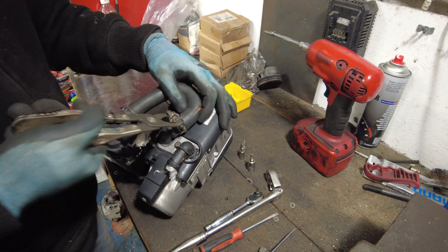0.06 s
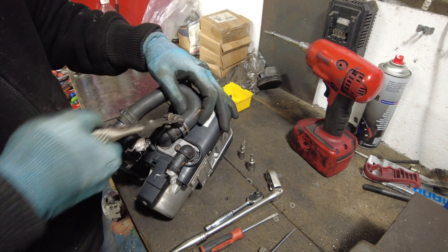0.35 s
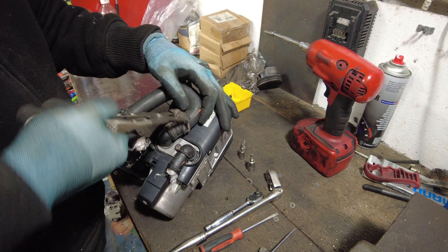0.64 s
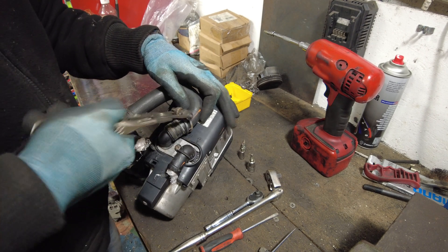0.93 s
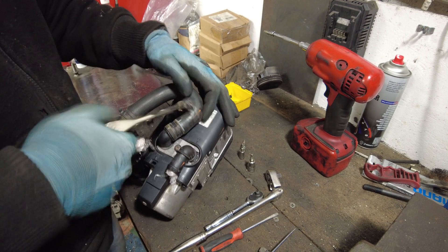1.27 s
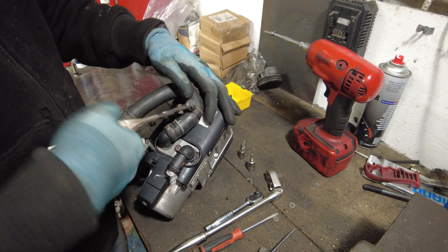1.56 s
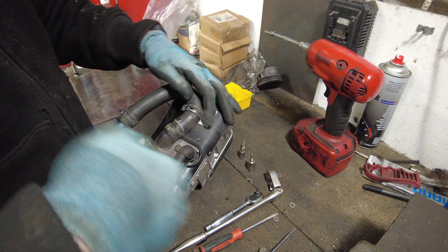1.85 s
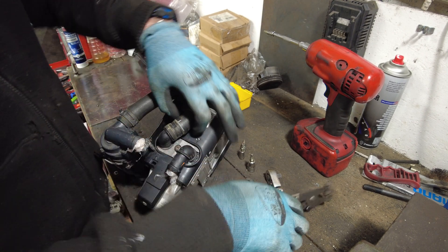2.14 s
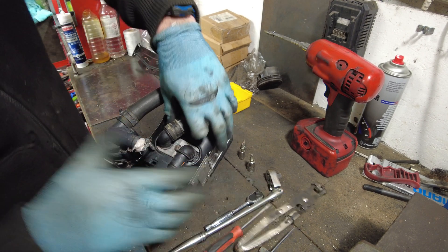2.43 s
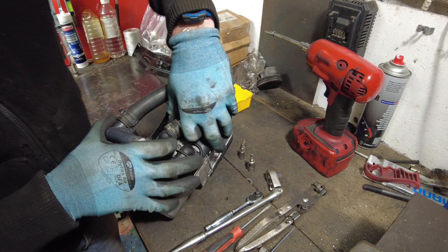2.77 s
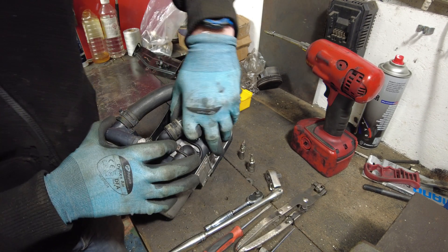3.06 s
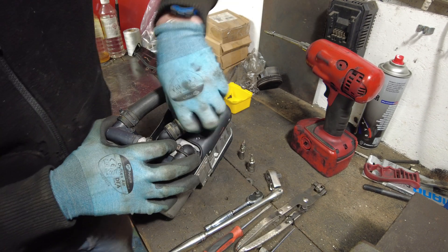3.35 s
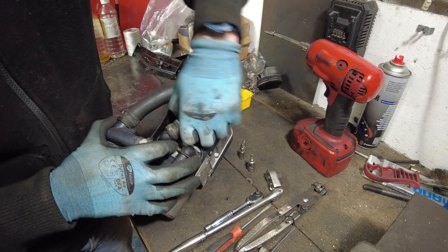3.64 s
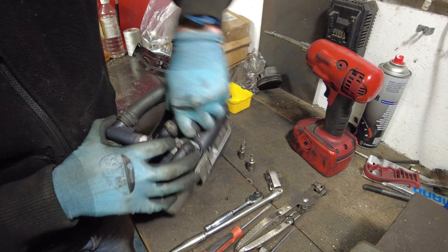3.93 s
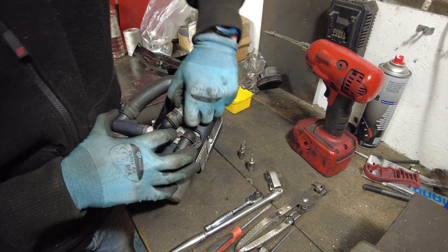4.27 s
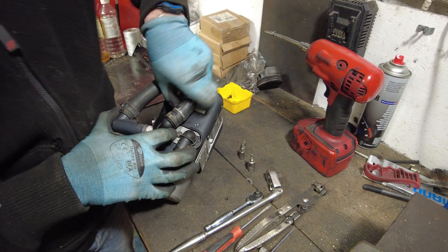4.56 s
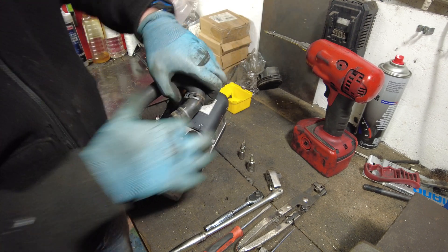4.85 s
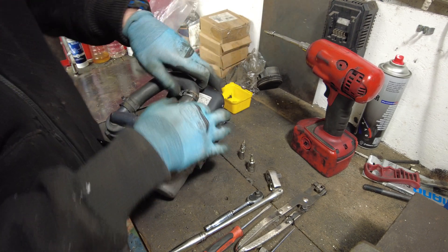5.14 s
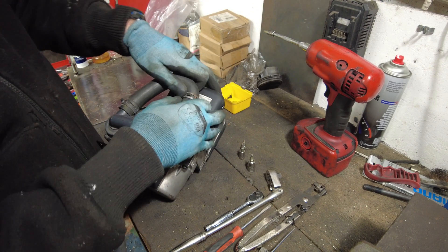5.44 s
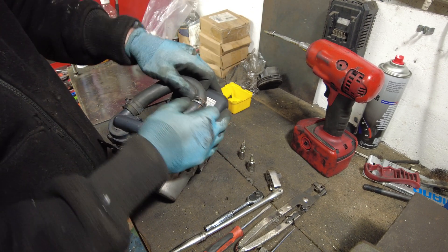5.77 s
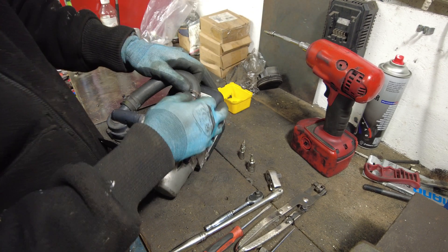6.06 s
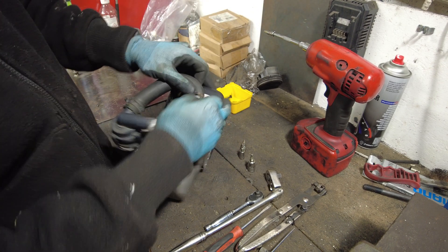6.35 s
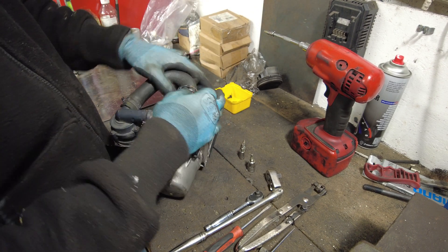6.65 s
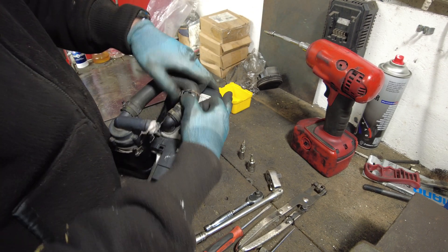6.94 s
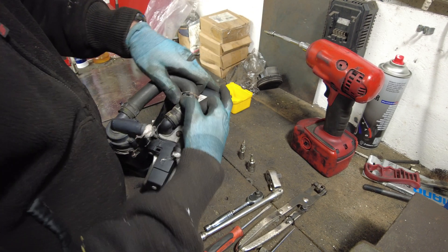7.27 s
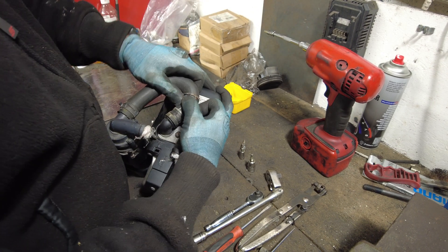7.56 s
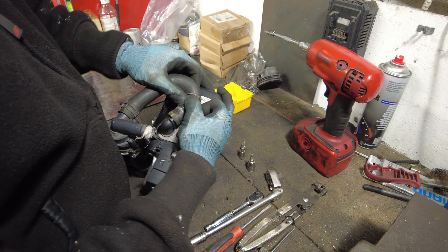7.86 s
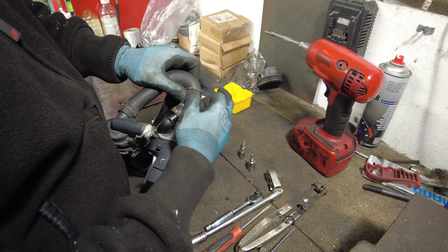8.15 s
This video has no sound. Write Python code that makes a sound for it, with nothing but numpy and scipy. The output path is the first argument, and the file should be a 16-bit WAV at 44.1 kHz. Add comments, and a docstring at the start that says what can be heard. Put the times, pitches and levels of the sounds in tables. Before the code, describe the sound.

Gloved hands work a rubber hose off a plastic housing with clicks and knocks, and dropped pliers clatter on a workbench.

```python
"""Working a hose off a heater

Gloved hands twist a rubber hose off a plastic heater body on the bench of a small workshop.
Pliers slip on the clamp, snap shut and are dropped, bouncing and jangling on the board.
The heater rocks, thumps and judders; rubber sticks and slips in ticks, creaks and a squeak.
Plastic clicks, gloves and sleeves rub, and the shaken bench rumbles in the microphone."""
import sys
import numpy as np
from scipy import signal
from scipy.fft import rfft, irfft, next_fast_len
from scipy.io import wavfile
from scipy.ndimage import uniform_filter1d

SR = 44100
rng = np.random.default_rng(int(sys.argv[2]) if len(sys.argv) > 2 else 0)


def master(y):
    """Save y as 16-bit WAV."""
    cut = np.clip(np.atleast_2d(y).T, -1, 1)
    pcm = np.round(cut * 32767)  # scale
    wavfile.write(sys.argv[1], SR, pcm.astype(np.int16))


N = 366461
TIME = np.arange(N) / SR

# Table levels are relative: each layer adds its own trim.
# the dropped pliers land, topple and bounce: start_s, steel_db, board_db, jaw_ring_db
BOUNCES = [(2.2869, -27.5, -22, -44), (2.2939, -32.5, -27.5, -32.5), (2.336, -41, -43, -58.5),
           (2.382, -15.5, -17.5, -24), (2.4011, -27, -6.5, -47.5), (2.426, -31, -30, -33.5),
           (2.454, -30.5, -20, -38.5), (2.519, -29.5, -16, -61), (2.545, -30.5, -41, -57),
           (2.5767, -58, -28.5, -75), (2.646, -39.5, -34, -67)]
# spectrum of a dry steel click: freq_hz, level_db
STEEL_CLICK = [(300, -25.5), (700, -13), (1500, -11), (2100, 2), (2500, -4.5), (3150, 1), (3900, -1.5),
               (4400, 1), (5500, -7.5), (6500, -4), (7000, -9.5), (8500, -9)]
# spectrum of its bright edge: freq_hz, level_db
STEEL_EDGE = [(8000, -5.5), (9500, 1), (10500, -2), (11600, -1), (13000, -2.5), (14600, -3.5), (15900, -3)]
# the heater rocks, knocking when hard and thudding when soft: start_s, level_db, hardness_db
THUMPS = [(0.025, -38, -2), (0.062, -39, -11), (0.249, -35.5, -4.5), (0.408, -50, -8), (0.825, -46, -4),
          (1.352, -20, 5), (1.359, -25, 3), (1.386, -35.5, 8.5), (1.401, -44, 16), (1.515, -43.5, 11),
          (1.529, -41, 3.5), (2.851, -51.5, -7.5), (4.007, -44, 0.5), (4.114, -41.5, -0.5),
          (4.285, -54, 11), (4.621, -43, 4.5), (4.996, -43.5, 0), (5.064, -35.5, 1), (5.148, -42, 2.5),
          (5.431, -39, -3), (5.997, -48.5, 11), (6.523, -34, -1.5), (6.645, -41.5, 2.5),
          (7.163, -52, -12.5), (7.563, -56, 3.5)]
# modes of the plastic casing: pitch_hz, level_db, t60_s
CASING_MODES = [(338, -8.5, 0.03), (394, -2.5, 0.025), (457, 2.5, 0.035), (500, -12.5, 0.18),
                (576, -1, 0.017), (655, -7, .015), (880, -7.5, 0.012)]
# spectrum of a dull bump on the casing: freq_hz, level_db
CASING_BUMP = [(90, 11), (170, -7), (320, -5.5), (600, -17.5), (1100, -45), (2500, -45)]
# effort of the hands: time_s, rubbing_db, bench_sway_db
HANDLING = [(0.0, -57.5, -36.5), (0.67, -67.5, -53), (1.2, -63, -56), (1.55, -52, -48), (1.78, -64, -51.5),
            (2.27, -60.5, -49), (2.48, -44, -40), (2.71, -62, -48.5), (3.17, -63.5, -55.5),
            (3.96, -60, -51.5), (4.14, -60.5, -46), (4.44, -63, -52.5), (5.09, -57.5, -42),
            (5.81, -67.5, -56), (6.43, -63, -50.5), (7.1, -61, -54), (7.55, -69, -57), (8.31, -75, -56)]


def pliers(slip_lead_s=0.0059):
    """Steel contacts click and set the jaws ringing; in the fall the handles jangle too."""
    # the held pliers slip on the clamp, then snap shut: start_s, click_db, edge_db
    clamp_clicks = [(1.3453, -45, -56), (1.3833, -31.5, -55), (1.5268, -25.5, -37.5), (1.636, -40, -72),
                    (1.6428, -37.5, -60), (1.7443, -47.5, -70), (1.888, -46.5, -65), (2.01, -9, -27)]
    # thin ring of the jaws: pitch_hz, level_db, t60_s
    jaw_modes = [(7280, -4, .025), (7396, -4, 0.072), (7480, -3, 0.035)]
    # the last bounces shake a loose steel part: start_s, level_db
    loose_rings = [(2.534, -56), (2.646, -74)]
    # modes of that part: pitch_hz, level_db, t60_s
    loose_modes = [(9660, 0, .16), (9750, -2, .09)]
    out = np.zeros(N)
    contacts = [(s, db, edge_db, db - 24) for s, db, edge_db in clamp_clicks]  # the hand damps the jaws
    for s, db, _, ring_db in BOUNCES:
        contacts.append((s, db, db - 12.5 - bench_damping_db(s), ring_db))
        add(out, s, from_db(db - 14.5) * jangle())
    for s, click_db, edge_db, ring_db in contacts:
        add(out, s, from_db(click_db - 8) * crack(STEEL_CLICK, t60=0.014, after_db=-26.5, after_t60=0.08))
        add(out, s, from_db(edge_db) * crack(STEEL_EDGE, t60=0.011, after_db=-19.5, after_t60=0.067))
        add(out, s, from_db(ring_db - 2) * strike(jaw_modes, grit=0.28, grit_t60=0.01, vary_db=4))
    for s, db, _ in clamp_clicks:
        skid = crack(STEEL_CLICK, t60=0.012, after_db=-18.5, after_t60=0.03)
        add(out, s - slip_lead_s, from_db(db - 37) * skid)
    for s, db in loose_rings:
        add(out, s, from_db(db) * strike(loose_modes, grit=0.6, grit_t60=0.03))
    return out


def joint_rattle(rebounds_per_s=520, longest_s=0.055, fade_db=9):
    """The pliers' loose joint chatters after each bounce, more briefly after weak ones."""
    out = np.zeros(N)
    hardest_db = max(db for _, db, _, _ in BOUNCES)
    for s, db, _, _ in BOUNCES:
        length_s = longest_s * from_db(0.5 * (db - hardest_db))
        count = max(int(length_s * rebounds_per_s), 1)
        edge_gain = from_db(-0.5 - bench_damping_db(s))
        for progress in (np.arange(count) + rng.random(count)) / count:
            gain = from_db(db - 23 - fade_db * progress + rng.standard_normal())
            click = crack(STEEL_CLICK, t60=0.0069, after_db=-12.5, after_t60=0.035)
            edge = edge_gain * crack(STEEL_EDGE, t60=0.009, after_db=-18, after_t60=0.045)
            at = s + progress * length_s
            add(out, at, gain * (click + edge))
            add(out, at, gain * from_db(-8.5) * jangle())
    return out


def jangle(t60=0.035):
    """The steel handles ring briefly, a little differently at each touch."""
    # overtones of the handles: pitch_hz, level_db
    overtones = [(2240, -6.5), (2980, -0.5), (3456, -1), (4587, -4.5), (4829, -3), (5529, 0), (6223, 0),
                 (6500, -1), (9254, -10.5), (13750, -7.5), (14680, -6)]
    return strike([(hz, db, t60) for hz, db in overtones], grit=1, grit_t60=0.035, detune=0.0073)


def bench_damping_db(s, flat_at_s=2.39, db_per_s=85.5):
    """Once the pliers lie flat, the bench takes more and more off their bright edge."""
    return db_per_s * max(s - flat_at_s, 0)


def bench_knocks(low_cut_hz=270, second_handle_s=0.007):
    """Both handles hit the board, which radiates little bass; the weight thuds through the frame."""
    # knock of the board: pitch_hz, level_db, t60_s
    board_modes = [(272, -24.5, 0.085), (371, -4, 0.054), (420, -4.5, 0.064), (496, 6, 0.048),
                   (578, -7, 0.088), (643, -4, 0.11), (760, -11.5, 0.14), (836, -17.5, 0.086)]
    # its higher clack: pitch_hz, level_db, t60_s
    clack_modes = [(930, -6, 0.04), (981, -13.5, 0.15), (1137, 0.5, 0.024), (1194, -9.5, 0.12),
                   (1367, -15, 0.05), (1520, -4.5, .025), (1737, -17, 0.11)]
    # spectrum of the clatter on the bench top: freq_hz, level_db
    clatter = [(350, -11.5), (700, 5.5), (1200, 3), (1650, -12), (2100, -22), (3500, -23.5)]
    # modes of the bench frame: pitch_hz, level_db, t60_s
    frame_modes = [(71, -1.5, 0.08), (96, -3.5, 0.16), (205, -3, 0.05), (271, 1, 0.049)]
    board, frame = np.zeros((2, N))
    for s, _, db, _ in BOUNCES:
        for at, blow_db in ((s, db), (s + second_handle_s, db - 15.5)):
            add(board, at, from_db(blow_db - 6.5) * strike(board_modes, grit=0.18, grit_t60=0.05))
            clack_gain = from_db(1.3 * blow_db - 11.5)  # hard blows clack more
            add(board, at, clack_gain * strike(clack_modes, grit=0.34, grit_t60=0.05))
            add(board, at, clack_gain * crack(clatter, t60=0.018, after_db=-6, after_t60=0.21))
        frame_db = min(-30.5 - 58.5 * (s - BOUNCES[0][0]), db)  # the first bounces carry the weight
        add(frame, s, from_db(frame_db) * strike(frame_modes, grit=0.71, grit_t60=0.09))
    low_cut = signal.butter(3, low_cut_hz, "high", fs=SR, output="sos")
    return signal.sosfilt(low_cut, board) + frame


def heater_thumps(high_cut_hz=1300):
    """The casing knocks, its hollow booms and its weight thuds; the grip shifts the pitches."""
    # boom of the hollow: pitch_hz, level_db, t60_s
    boom_modes = [(97, -10.5, 0.25), (150, -4.5, 0.033), (190, 1.5, 0.071), (281.7, -1.5, 0.06)]
    # thud through the bench: pitch_hz, level_db, t60_s
    thud_modes = [(37, -5.5, 0.067), (50, 0.5, 0.099), (74.4, 0.5, 0.014)]
    out = np.zeros(N)
    for s, db, hardness_db in THUMPS:
        knock = strike(CASING_MODES, grit=0.41, grit_t60=0.14, detune=0.018)
        bump = crack(CASING_BUMP, t60=0.034, after_db=-14, after_t60=0.058)
        boom = strike(boom_modes, grit=0.54, grit_t60=0.044, detune=0.039)
        thud = strike(thud_modes, grit=0.4, grit_t60=0.044, detune=0.085)
        add(out, s, from_db(db + hardness_db - 4.5) * knock)
        add(out, s, from_db(db + 0.28 * hardness_db - 4.5) * bump)
        add(out, s, from_db(db + 0.44 * hardness_db - 5) * boom)
        add(out, s, from_db(db - hardness_db + 5) * thud)
    return signal.sosfilt(signal.butter(2, high_cut_hz, fs=SR, output="sos"), out)


def heater_judders(slips_per_s=320):
    """The heater's feet stick and slip on the bench; each slip knocks the casing."""
    # shoves: start_s, length_s, level_db
    shoves = [(1.643, 0.045, -45), (3.912, .03, -55.5), (4.02, 0.14, -52), (5.062, 0.052, -54),
              (5.982, 0.05, -54.5)]
    slips = (rng.random(N) < slips_per_s / SR) * rng.standard_normal(N)
    knock = strike(CASING_MODES, grit=0.1, grit_t60=0.008, vary_db=1.5)
    return sliding(shoves) * unit_power(signal.fftconvolve(slips, knock)[:N])


def hose_ticks(usual_hz=1240, tiny_per_s=9):
    """Rubber lets go with a damped pop and a small snap; tiny slips fall at random in between."""
    # hose and clamp tick on the plastic: start_s, level_db, pitch_hz
    ticks = [(0.02, -36, 1210), (0.034, -42, 950), (0.578, -47.5, 1160), (0.974, -50.5, 2270),
             (1.344, -21, 1235), (1.386, -25, 1280), (1.526, -26, 1690), (1.58, -38.5, 1670),
             (4.284, -47, 1300), (4.337, -24, 1270), (4.62, -35.5, 1227), (5.462, -36, 1270),
             (6.084, -46.5, 1290), (6.318, -38, 1240), (6.395, -42.5, 1560), (6.526, -30, 1000),
             (7.998, -46, 1204)]
    # spectrum of the plastic's snap: freq_hz, level_db
    snap = [(1900, 19), (2600, 4), (4000, 0.5), (7000, -15), (15000, -38)]
    out = np.zeros(N)
    chance = rng.random((int(tiny_per_s * N / SR), 3))
    tiny = [(when * TIME[-1], -67 + 10 * size, usual_hz * 2 ** (spot - 0.35))
            for when, size, spot in chance]
    for s, db, hz in ticks + tiny:
        pop_modes = [(hz * 0.84, -9, 0.014), (hz, 0, 0.016), (hz * 1.283, -6, 0.011)]
        snap_db = db - 17 + 11 * np.log2(hz / usual_hz)  # stiffer, higher spots snap more
        add(out, s, from_db(db - 4.5) * strike(pop_modes, grit=0.7, grit_t60=0.026, vary_db=3))
        add(out, s, from_db(snap_db) * crack(snap, t60=0.015, after_db=-21, after_t60=0.086))
    return out


def hose_creaks(slips_per_s=330, spread_db=4.5):
    """Twisted rubber sticks and slips unevenly; each slip sets the joint ringing."""
    # twists of the hose on its stub: start_s, length_s, level_db
    twists = [(0.736, 0.087, -48.5), (1.066, 0.037, -44), (1.318, 0.019, -34), (3.98, 0.044, -45.5)]
    # modes of the joint: pitch_hz, level_db, t60_s
    joint_modes = [(1165, 0.5, 0.059), (1300, -3.5, 0.033), (1540, -18, 0.037), (1800, -10.5, .025),
                   (2050, -15.5, 0.016), (2740, -17.5, 0.013)]
    slips = (rng.random(N) < slips_per_s / SR) * from_db(spread_db * rng.standard_normal(N))
    ring = strike(joint_modes, grit=0.15, grit_t60=0.008, vary_db=2.1)
    return sliding(twists) * unit_power(signal.fftconvolve(slips, ring)[:N])


def plastic_clicks():
    """Hard plastic meets plastic: a very short, wide crack on a dry bump of the casing."""
    # parts touch: start_s, click_db, bump_db
    clicks = [(3.107, -58, -41.5), (3.561, -48, -44), (3.6496, -39.5, -33.5), (4.6287, -39, -41),
              (4.6628, -53, -38), (4.708, -63, -35.5), (4.9984, -47, -30), (5.4598, -39.5, -48),
              (6.2, -50, -43.5), (8.0529, -53, -44)]
    # spectrum of the click: freq_hz, level_db
    plastic = [(500, -21), (1000, 9), (2300, 3), (3300, -4), (5000, -13.5), (8000, -18.5), (14000, -37)]
    out = np.zeros(N)
    for s, click_db, bump_db in clicks:
        add(out, s, from_db(click_db - 2) * crack(plastic, t60=0.022, after_db=-33, after_t60=0.03))
        add(out, s, from_db(bump_db - 3) * crack(CASING_BUMP, t60=0.031, after_db=-27, after_t60=0.06))
    return out


def squeaks():
    """Stick and slip: the hose gives a falling chirp, the housing sings roughly under a glove."""
    # the hose squeaks on its stub: time_s, fundamental_hz, level_db
    glide = [(0.62, 2280, -108), (0.64, 2157, -62), (0.66, 2145, -62), (0.672, 1580, -85),
             (0.682, 1600, -54.5), (0.70, 750, -69), (0.71, 590, -87)]
    # a glove drags over the housing: time_s, level_db
    drag = [(4.99, -58), (5.04, -1), (5.10, 1), (5.21, 12.5), (5.235, -16), (5.31, -12), (5.36, -62)]
    # the tones it raises: pitch_hz, level_db
    drag_tones = [(969, -74.5), (1211, -64), (2030, -67), (2900, -78.5), (4301, -78), (7079, -84.5),
                  (9588, -86.5)]
    hz, db = in_time(glide)
    phase = 2 * np.pi * np.cumsum(hz * (1 + 0.014 * drift(rate_hz=1300))) / SR
    chirp = from_db(db) * (np.sin(2 * phase) + 0.3 * np.sin(phase))
    singing = sum(from_db(tone_db + 2.5) * drift(rate_hz=380) * np.sin(2 * np.pi * tone_hz * TIME)
                  for tone_hz, tone_db in drag_tones)
    return chirp + from_db(in_time(drag)[0]) * singing


def rubbing(stick_db=-52, usual_db=-65):
    """Gloves drag on hose and casing with a swish of fabric; hard strokes stick into a narrow rasp."""
    # gloves drag on the rubber: start_s, length_s, level_db
    glove_strokes = [(0.008, 0.048, -47), (0.734, 0.086, -57), (1.066, 0.06, -52.5), (1.225, 0.094, -64),
                     (1.294, 0.11, -50.5), (1.503, 0.012, -48), (1.645, 0.048, -57.5), (2.223, 0.053, -58),
                     (2.86, 0.075, -66.5), (3.584, 0.069, -57.5), (3.72, 0.13, -61.5), (3.885, .07, -59),
                     (3.973, 0.082, -59.5), (4.039, 0.12, -53), (6.412, 0.16, -58), (6.825, 0.17, -54.5),
                     (6.97, 0.11, -60.5), (7.09, 0.14, -57.5), (7.335, 0.089, -61.5), (7.685, 0.11, -63.5),
                     (7.959, 0.12, -58.5)]
    # a sleeve brushes past: start_s, length_s, level_db
    sleeve_moves = [(0.01, 0.4, -68), (3.268, 0.062, -58), (3.364, 0.12, -67.5), (4.69, 0.25, -64),
                    (5.823, 0.12, -66), (6.42, 0.085, -63), (6.655, 0.045, -66.5), (6.827, 0.14, -63.5),
                    (7.959, 0.081, -68)]
    # a glove scrapes over the housing: start_s, length_s, level_db
    scrapes = [(5.05, 0.18, -56.5), (5.23, 0.1, -57)]
    # low rub of the casing: freq_hz, level_db
    casing_spectrum = [(60, -11), (100, 8.5), (200, 1), (320, -0.5), (480, -1), (750, -5.5), (1100, -36.5)]
    # sliding glove: freq_hz, level_db
    glove_spectrum = [(100, -40.5), (500, -20.5), (900, -1), (1200, 0), (2100, -4), (2700, -7), (3600, -17),
                      (4500, -15.5), (7000, -23.5), (14000, -42)]
    # sticking rubber: freq_hz, level_db
    rasp_spectrum = [(300, -43.5), (850, -12), (1140, -5.5), (1280, 2), (1420, 0), (1950, -13.5),
                     (2500, -16.5), (3500, -38), (7000, -46.5)]
    # hiss of fabric: freq_hz, level_db
    fabric_spectrum = [(1800, -19), (3200, -0.5), (4500, -1.5), (7000, -4), (10000, -8.5), (13000, -11),
                       (16000, -15)]
    # gritty scrape: freq_hz, level_db
    scrape_spectrum = [(400, -19.5), (900, -1.5), (1250, 1), (2100, -7), (2500, -20.5), (5000, -20),
                       (12000, -33.5)]
    effort_db, _ = in_time(HANDLING)
    pressure = from_db(usual_db + 0.87 * (effort_db - usual_db))
    strokes, sleeves = sliding(glove_strokes), sliding(sleeve_moves)
    # The glove slides with each arm move, and its knitted back hisses with each stroke.
    grip = from_db(-7.5) * pressure + from_db(-3.5) * strokes + from_db(-4.5) * sleeves
    swish = from_db(-17) * pressure + from_db(-3) * sleeves + from_db(-24) * strokes
    sticking = grip ** 2 / (grip ** 2 + from_db(stick_db) ** 2)
    casing_drive = from_db(-3.5) * pressure + from_db(-5.5) * grip
    casing = casing_drive * friction(casing_spectrum, grain_db=2.5, flutter_db=3.5)
    gloves = grip * np.sqrt(1 - sticking) * friction(glove_spectrum, grain_db=1.5, flutter_db=4.3)
    rasp = from_db(3) * grip * np.sqrt(sticking) * friction(rasp_spectrum, grain_db=4, flutter_db=-0.5)
    fabric = swish * friction(fabric_spectrum, grain_db=1, flutter_db=2)
    scrape = sliding(scrapes) * friction(scrape_spectrum, grain_db=4.5, flutter_db=1)
    return casing + gloves + rasp + scrape + fabric


def bench_rumble(jolt_t60=0.7, jolt_rise_s=0.012):
    """The bench sways under the hands, more after each thump, and shakes the microphone."""
    # deep rumble: freq_hz, level_db
    spectrum = [(8, -28), (20, 8), (35, -3), (50, 0), (65, -11), (80, -20), (98, -17), (140, -28),
                (300, -59.5), (900, -100)]
    _, sway_db = in_time(HANDLING)
    power = from_db(sway_db + 3) ** 2
    jolt = decay(TIME[:SR], jolt_t60) * (1 - np.exp(-TIME[:SR] / jolt_rise_s))
    for s, db, hardness_db in THUMPS:
        add(power, s, (from_db(db - hardness_db - 10) * jolt) ** 2)
    return np.sqrt(power) * colour(rng.standard_normal(N), spectrum)


def room_tone(level_db=-63):
    """A steady low murmur with a faint hiss."""
    # the quiet workshop: freq_hz, level_db
    spectrum = [(12, -28), (20, 4), (48, -4.5), (96, -5), (255, -27.5), (849, -32), (1260, -39),
                (1810, -42), (2390, -31), (3160, -38), (12100, -45), (16000, -70)]
    return from_db(level_db) * colour(rng.standard_normal(N), spectrum)


def workshop(x, early_db, early_t60, tail_db):
    """Adds quick scatter from bench and wall, then a tail that dies sooner in the treble."""
    # decay of the room: freq_hz, t60_s
    room_t60 = [(100, 0.38), (500, 0.25), (1500, 0.16), (4000, 0.23), (8000, 0.22), (15000, 0.11)]
    t = TIME[:SR // 2]
    octaves_hz = 62.5 * 2 ** np.arange(9)
    tail = 0
    for low, high in zip(octaves_hz, octaves_hz[1:]):
        band_pass = signal.butter(2, [low, high], "band", fs=SR, output="sos")
        band = signal.sosfilt(band_pass, rng.standard_normal(len(t)))
        tail = tail + band * decay(t, at_hz(room_t60, np.sqrt(low * high)))
    early = rng.standard_normal(len(t)) * decay(t, early_t60) * (t > 0.003)
    tail = tail * (t > 0.008)
    echo = from_db(early_db) * early / np.linalg.norm(early)
    echo += from_db(tail_db) * tail / np.linalg.norm(tail)
    return x + signal.fftconvolve(x, echo)[:N]


def strike(modes, grit, grit_t60, vary_db=3.5, detune=0):
    """One blow: modes ring with fresh strengths while the contact chatters briefly."""
    hz, db, t60 = np.transpose(modes)[:, :, None]
    hz = hz * (1 + detune * rng.standard_normal(hz.shape))
    t = TIME[:int(min(t60.max(), 0.5) * SR)]
    polarity = (-1) ** np.arange(len(db))[:, None]
    gains = polarity * from_db(db + vary_db * rng.standard_normal(db.shape))
    ring = np.sum(gains * np.sin(2 * np.pi * hz * t) * decay(t, t60), axis=0)
    contact_t = TIME[:SR // 10]
    chatter = rng.standard_normal(len(contact_t)) * decay(contact_t, grit_t60)
    force = (contact_t == 0) + grit * chatter / np.linalg.norm(chatter)
    return punch(signal.fftconvolve(ring, force))


def crack(spectrum, t60, after_db, after_t60, rise_s=0.00028):
    """Overtones too crowded to have a pitch: a sudden burst, then a weaker after-ring."""
    t = TIME[:SR // 8]
    hz = np.fft.rfftfreq(len(t), 1 / SR)
    inside = (hz > spectrum[0][0]) & (hz < spectrum[-1][0])
    overtones = irfft(rfft(rng.standard_normal(len(t))) * inside * from_db(at_hz(spectrum, hz)), len(t))
    envelope = decay(t, t60) + from_db(after_db) * decay(t, after_t60)
    return punch(overtones * envelope * (1 - np.exp(-t / rise_s)))


def friction(spectrum, grain_db, flutter_db):
    """Countless tiny slips of uneven size, coming in clumps."""
    slips = rng.standard_normal(N)
    clumps = from_db(grain_db * drift(rate_hz=700) + flutter_db * drift(rate_hz=45))
    return colour(slips * clumps, spectrum)


def sliding(moves):
    """Summed gain of moves that each swell, ease off and stop."""
    progress, gain = [-0.1, 0.28, 0.88, 1.01], [0.0022, 1.0, 0.55, 0.0029]
    return sum(from_db(db) * np.interp((TIME - s) / length, progress, gain) for s, length, db in moves)


def colour(x, spectrum):
    """Give a steady sound a spectrum, at unit power."""
    size = next_fast_len(N)
    gains = from_db(at_hz(spectrum, np.fft.rfftfreq(size, 1 / SR)))
    return unit_power(irfft(rfft(x, size) * gains, size)[:N])


def drift(rate_hz):
    """A random wander with a spread of about one."""
    knots = rng.standard_normal(int(N / SR * rate_hz) + 2)
    return np.interp(TIME * rate_hz, np.arange(len(knots)), knots)


def decay(t, t60):
    """A fade of 60 dB every t60 seconds."""
    return np.exp(-np.log(1000) * t / t60)


def punch(blow):
    """Scale a blow so that its loudest 4 ms have unit power."""
    return blow / np.sqrt(uniform_filter1d(blow ** 2, size=176).max())


def unit_power(x):
    """Scale to a mean square of one."""
    return x / np.sqrt(np.mean(x ** 2) + 1e-20)


def from_db(db):
    """Decibels to gain."""
    return 10 ** (np.asarray(db) / 20)


def in_time(rows):
    """Each column of a curve, at every sample."""
    s, *columns = np.transpose(rows)
    return [np.interp(TIME, s, column) for column in columns]


def at_hz(points, hz):
    """Read a table on a log-frequency axis."""
    freq_hz, value = np.transpose(points)
    return np.interp(np.log(np.maximum(hz, 1)), np.log(freq_hz), value)


def add(out, s, sound):
    """Mix a sound in at s seconds."""
    start = max(int(s * SR), 0)
    out[start:start + len(sound)] += sound[:N - start]


def scene():
    """Sharp and dull contacts echo in the workshop, over rubbing, rumble and room tone; mono."""
    sharp = pliers() + joint_rattle() + hose_ticks() + plastic_clicks() + hose_creaks() + squeaks()
    sharp = workshop(sharp, early_db=-10.5, early_t60=0.046, tail_db=-18)
    dull = bench_knocks() + heater_thumps() + heater_judders()
    dull = workshop(dull, early_db=-18.5, early_t60=0.11, tail_db=-14.5)
    return (sharp + dull + room_tone() + rubbing() + bench_rumble())[None]


def record(dry):
    """A steep cut takes off the very top."""
    cutoff_hz = 15900
    return signal.sosfilt(signal.ellip(10, 0.1, 80, cutoff_hz, fs=SR, output="sos"), dry)


dry = scene()
out = record(dry)
master(out)
```